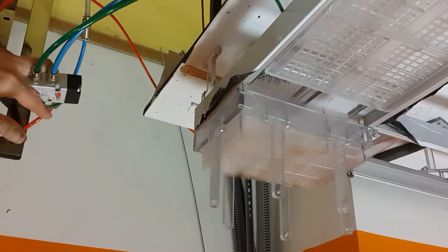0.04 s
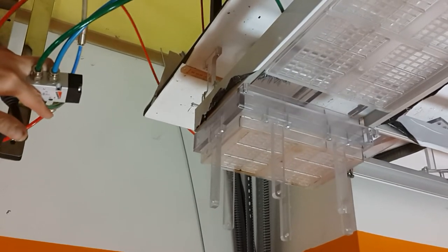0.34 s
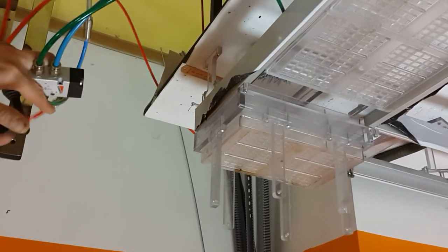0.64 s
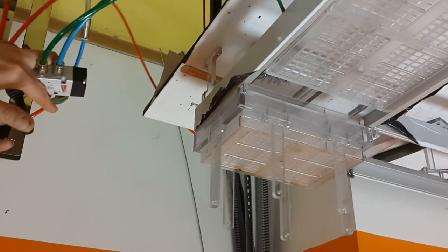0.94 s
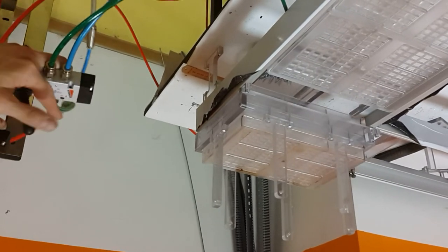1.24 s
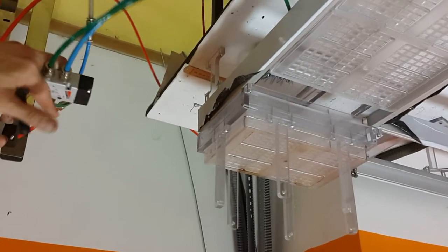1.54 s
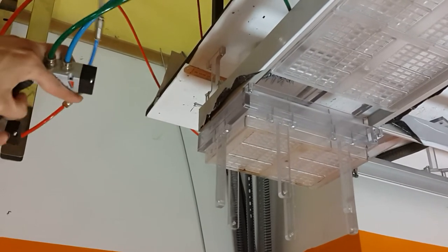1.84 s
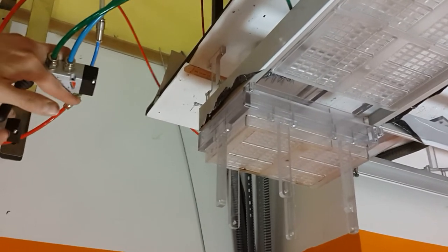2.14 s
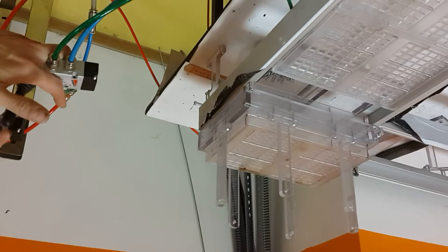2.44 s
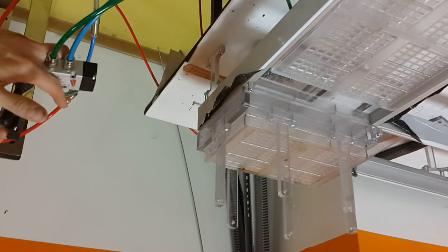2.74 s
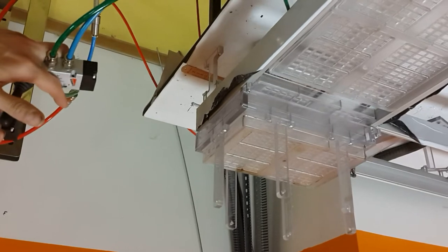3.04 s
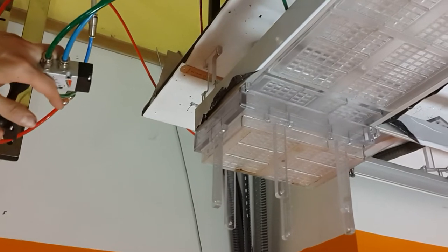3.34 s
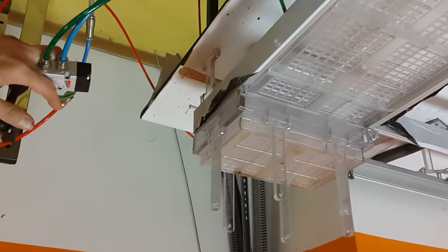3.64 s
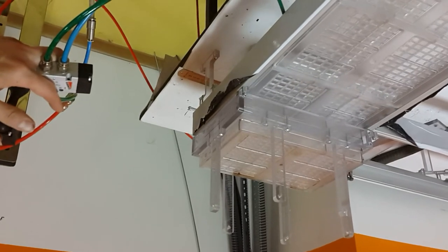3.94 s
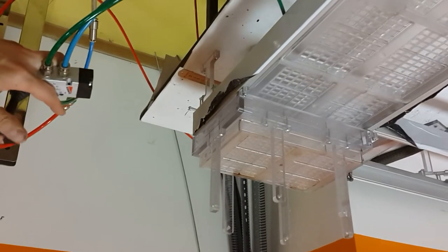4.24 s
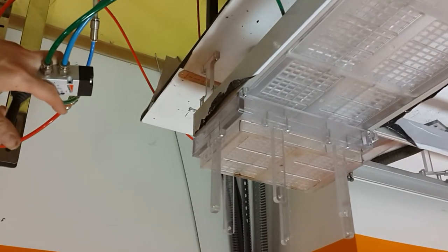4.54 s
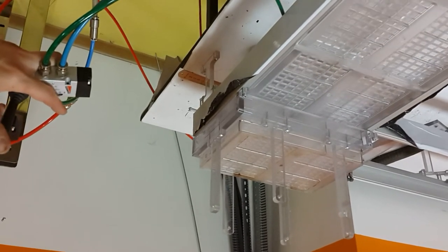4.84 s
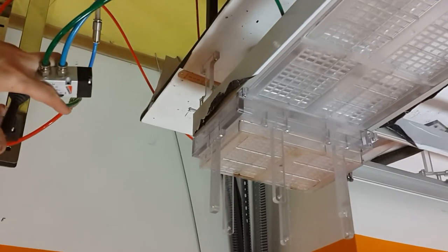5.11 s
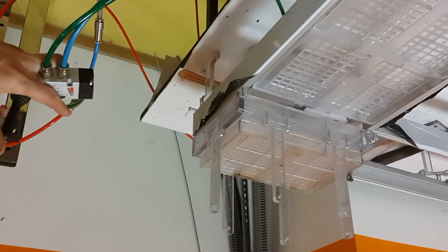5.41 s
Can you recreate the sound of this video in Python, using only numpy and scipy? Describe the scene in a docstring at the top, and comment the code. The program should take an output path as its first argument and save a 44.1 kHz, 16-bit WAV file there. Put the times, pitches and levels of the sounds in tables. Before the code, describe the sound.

A pneumatic machine gusts and thumps, then hisses steadily over motor hum as its sliding tray squeals once and steel clacks.

```python
"""Gusts of air burst out as a hand valve switches the air cylinders of a machine in a workshop.
The strokes end in clacks of steel on steel and thumps that shake the frame. Air hisses on through a
silencer, and a sliding tray squeals once, over background rumble and motor hum.
Hard walls echo. Two close microphones hear it, and a limiter turns down the loudest blows."""
import sys
import numpy as np
from scipy import signal
from scipy.fft import rfft, irfft, next_fast_len
from scipy.io import wavfile
from scipy.ndimage import uniform_filter1d, minimum_filter1d

SR = 44100
rng = np.random.default_rng(int(sys.argv[2]) if len(sys.argv) > 2 else 0)


def pcm_store(signal):
    """Save signal as 16-bit PCM."""
    levels = np.round(np.clip(np.atleast_2d(signal), -1, 1) * 32767)
    wavfile.write(sys.argv[1], SR, levels.astype(np.int16).T)


N = 250047
TIME = np.arange(N) / SR
SIDES = np.array([[.5], [-.5]])  # splits a left-right difference between the two channels
BLEED_S, SLIDE_S = 1.977, 2.627  # air starts to leak out; the tray starts to slide


def amp(db):
    """Turns decibels into a gain."""
    return 10 ** (np.asarray(db) / 20)


def unit(x):
    """Scales a signal to an average power of 1."""
    return x / np.sqrt(np.mean(x ** 2) + 1e-20)


def read(points, hz):
    """Reads between the rows of a table, on a log-frequency axis."""
    f, value = np.transpose(points)
    return np.interp(np.log(hz + 1), np.log(f + 1), value)


def ramp(start_s, rise_s):
    """A smooth step from 0 to 1."""
    return np.sin(np.pi / 2 * np.clip((TIME - start_s) / rise_s, 0, 1)) ** 2


def after(s):
    """Seconds since a moment, zero before it."""
    return np.maximum(TIME - s, 0)


def add(mix, s, sound):
    """Mixes in a two-channel sound at s seconds."""
    part = mix[:, max(round(s * SR), 0):][:, :sound.shape[1]]
    part += sound[:, :part.shape[1]]


def colour(x, db_of):
    """Shapes the tone by a curve of dB against Hz, with a filter that never rings ahead of the sound."""
    hz = abs(np.fft.fftfreq(4096, 1 / SR))
    log_gain = np.log(amp(np.maximum(db_of(hz), -100)))
    taps = np.fft.ifft(np.exp(np.conj(signal.hilbert(log_gain)))).real[:2048]
    return signal.oaconvolve(x, taps[None] / np.linalg.norm(taps), axes=1)[:, :x.shape[1]]


def turbulence(spectrum, patchy_db):
    """Rushing noise whose level drifts in small patches of time and pitch."""
    hz, frames = np.fft.rfftfreq(1024, 1 / SR), N // 256 + 5
    shape = (2, len(hz), frames)
    noise = rng.standard_normal(shape) + 1j * rng.standard_normal(shape)
    patches = uniform_filter1d(rng.standard_normal(shape[1:]), size=4, axis=0)
    patches = uniform_filter1d(patches, size=8, axis=1)
    noise *= amp(read(spectrum, hz)[:, None] + patchy_db * unit(patches))
    return unit(signal.istft(noise, nperseg=1024, noverlap=768)[1][:, :N])


def panel_echoes(x, echo_db):
    """Panels near the valve throw back eight quick echoes that colour the sound."""
    out = x.copy()
    for side in range(2):
        for delay in rng.uniform(0.00055, .014, size=8):
            out[side] += amp(echo_db) * np.interp(TIME - round(delay * SR) / SR, TIME, x[side], left=0)
    return out / np.sqrt(1 + 8 * amp(echo_db) ** 2)


def room(x, build_s):
    """Wall echoes blur into a tail that builds up, then dies at its own speed in each band."""
    # echo length (t60 is the time to fade by 60 dB): f/Hz, t60/s
    fade_times = [(100, 0.48), (400, 0.84), (1500, 0.83), (4000, 0.76), (7000, 0.66), (11000, 0.43),
                  (16000, 0.44)]
    hz, t, noise = signal.stft(rng.standard_normal((2, int(1.3 * SR))), SR, nperseg=256)
    tail = signal.istft(noise * amp(-60 * t / read(fade_times, hz)[:, None]), SR, nperseg=256)[1]
    tail *= 1 - np.exp(-(TIME[:tail.shape[1]] / build_s) ** 2)
    return signal.fftconvolve(x, tail / np.linalg.norm(tail[0]), axes=1)[:, :N]


def microphones(x):
    """Two close microphones hear the bass alike and the treble apart; the left one faces the valve."""
    # how alike the two sides are: f/Hz, correlation (1 = the same)
    likeness = [(100, 1), (300, 0.91), (600, 0.69), (1000, 0.28), (1500, -0.22), (2300, -0.02),
                (3500, -0.12), (6500, 0.086), (15000, -0.19)]
    # how much louder the left side is: f/Hz, left minus right/dB
    balance = [(60, -6.5), (110, 2), (200, -1), (380, 2), (700, -2), (1290, -3), (2380, 1.5), (4400, 5.0),
               (8120, 6), (15000, 0.5)]
    size = next_fast_len(N + 4096)
    hz = np.fft.rfftfreq(size, 1 / SR)
    same = np.clip(read(likeness, hz), -.99, .99)
    mid, side = rfft(x, size) * np.sqrt([(1 + same) / 2, (1 - same) / 2])
    return irfft(np.array([mid + side, mid - side]) * amp(SIDES * read(balance, hz)), size)[:, :N]


def background(hum_db=33, swell_s=0.38, rest_db=-63.5):
    """Rumble and motor hum grow louder as the hiss rises, like a recorder turning up its gain."""
    # tone of the rumble: f/Hz, level/dB
    spectrum = [(25, -41), (60, -25.5), (150, -0.5), (300, 2.5), (800, 2), (1300, 1.5), (2000, 0),
                (3200, -9), (6500, -14), (9000, -25), (15500, -26.5)]
    # motor tones: f/Hz, relative level/dB
    motors = [(48.4, -86.5), (70.0, -56), (96.9, -71.5), (145.3, -51), (209.9, -56)]
    opening_fade = amp(-41 - 10.5 * TIME)
    first_rise = ramp(BLEED_S - swell_s, swell_s) * amp(-52)
    second_rise = ramp(SLIDE_S, swell_s) * amp(-33 - 10.5 * np.exp(-after(SLIDE_S) / 0.77))
    level = np.sqrt(amp(rest_db) ** 2 + opening_fade ** 2 + first_rise ** 2 + second_rise ** 2)
    rumble = turbulence(spectrum, patchy_db=.8)
    hum = np.zeros(N)
    for hz, db in motors:
        drift = np.cumsum(rng.standard_normal(N)) / np.sqrt(SR)
        hum += amp(db + hum_db) * np.sqrt(2) * np.sin(2 * np.pi * hz * TIME + hz / 40 * drift)
    return level * rumble, level * hum


def silencer(bleed_db=-37.5, slide_db=-28):
    """Air hisses through a porous plug: a fading leak at first, a free flow once the tray slides."""
    # tone of the plug, with a broad high peak: f/Hz, level/dB
    spectrum = [(300, -19.5), (1000, -43), (1700, -10), (2050, -8), (2500, -8.5), (3200, -13), (4500, -11),
                (5500, -4), (6500, 3), (7500, -5.5), (9000, -11.5), (10300, -30), (15000, -40.5),
                (17000, -77)]
    bleed = ramp(BLEED_S, rise_s=0.043) * amp(bleed_db - 4 * after(BLEED_S))
    slide = ramp(SLIDE_S, rise_s=0.6) * amp(slide_db - 0.28 * after(SLIDE_S))
    hiss = turbulence(spectrum, patchy_db=.5)
    return panel_echoes(np.hypot(bleed, slide) * hiss, echo_db=-13)


def squeal(pitch_hz=1698, sharp_hz=20, settle_s=0.064, waver_hz=3.63, shimmer_db=2, t60=0.33):
    """One squeal swells, then its echo fades in uneven pulses that shift between left and right."""
    # the tray's squeal, then the pulses of its echo: t/s, swell/s, level/dB, left minus right/dB
    pulses = [(3.26, 0.16, -11, -2), (3.435, 0.023, -14, 1), (3.53, 0.082, -24, -9.5),
              (3.69, 0.03, -30, -13.5), (3.765, 0.038, -31.5, -9)]
    # thin overtones: multiple of the pitch, relative level/dB
    overtones = [(2, -21), (3, -22), (4, -28), (5, -33)]
    level = np.sqrt(sum((ramp(s, rise) * amp(db + SIDES * pan_db - 60 * after(s + rise) / t60)) ** 2
                        for s, rise, db, pan_db in pulses))
    hz = pitch_hz + sharp_hz * np.exp(-(after(pulses[0][0]) / settle_s) ** 4)  # starts sharp, settles
    waver, shimmer = (unit(uniform_filter1d(rng.standard_normal(N), size=600)) for _ in range(2))
    phase = 2 * np.pi * np.cumsum(hz + waver_hz * waver) / SR
    lead = SIDES * 1.85  # the left side leads, in radians
    tone = np.sin(phase + lead)
    strength = (level / level.max()) ** 0.41  # overtones stand out more when the tone is loud
    for multiple, db in overtones:
        tone += strength * amp(db + SIDES * 8) * np.sin(round(multiple) * phase + lead)
    return np.sqrt(2) * level * amp(shimmer_db * shimmer) * tone


def strike(modes, t60, ring_t60, ring_db, grain):
    """A blow is a fading rattle of tiny contacts that also rings the part's own notes (its modes)."""
    t = TIME[:int(.8 * SR)]
    flutter = unit(uniform_filter1d(rng.standard_normal(len(t)), size=50))
    chatter = unit(np.exp(grain * np.tanh(flutter)))
    contacts = chatter * amp(-60 * t / t60) * rng.standard_normal((2, len(t)))
    ring = sum(amp(db) * np.sin(2 * np.pi * (hz * t + rng.random((2, 1)))) for hz, db in modes)
    ring *= amp(-60 * t / ring_t60)
    ringing = signal.fftconvolve(contacts, ring / np.linalg.norm(ring[0]), axes=1)[:, :len(t)]
    return contacts + amp(ring_db) * ringing


def thumps(rise_s=0.0049, boom_hz=340, boom_db=3.5, bright_hz=3654, db_per_octave=10):
    """The frame and its sheet panels shake as they take the load; softer blows sound duller."""
    # blows to the frame: t/s, level/dB, rattle t60/s
    blows = [(0.058, -38, 0.045), (.128, -31, 0.22), (0.202, -3.5, 0.081), (.228, 3, 0.12), (.287, -5, 0.1),
             (.331, -5.5, 0.04), (0.849, -22, 0.087), (1.892, -38.5, 0.13), (2.96, -19.5, 0.14),
             (3.670, -20.5, 0.22), (3.924, -22.5, 0.22), (4.505, -28.5, 0.32), (4.564, -11.5, 0.1)]
    # ringing notes of the frame: f/Hz, level/dB
    modes = [(506.0, -43.5), (613.7, -57.5), (834.4, -30), (1055, -42), (1184, -40), (1437, -55.5),
             (1523, -33), (1631, -40.5), (1696, -55), (1733, -37.5), (1782, -45), (1890, -35),
             (2153, -34.5), (2245, -47), (2304, -62.5), (2406, -46), (2783, -54.5), (2821, -76)]
    # overall tone of the frame: f/Hz, level/dB
    spectrum = [(40, -35), (90, -12.5), (170, -5.5), (320, -4), (900, 2.5), (2000, 4), (4000, 2), (7000, 6),
                (10000, 0), (15000, -7), (17000, -11.5)]
    out = np.zeros((2, N))
    body_db = lambda f: read(spectrum, f) + boom_db / (1 + (3 * (f / boom_hz - 1)) ** 2)
    for s, db, t60 in blows:
        blow = strike(modes, t60, ring_t60=.22, ring_db=-25, grain=.2)
        blow *= 1 - np.exp(-TIME[:blow.shape[1]] / rise_s)
        cutoff_hz = bright_hz * 2 ** (db / db_per_octave)
        add(out, s, amp(db) * colour(blow, lambda f: body_db(f) - 7 * np.log(1 + (f / cutoff_hz) ** 2)))
    return out


def clacks():
    """Steel stops meet; the hardness of each contact sets which band of pitches stands out."""
    # blows on the stops: t/s, level/dB, band centre/Hz, rattle t60/s
    blows = [(0.2003, -4.5, 2860, 0.08), (1.892, -27, 2180, 0.02), (2.927, -26.5, 1080, 1),
             (2.957, -18, 1630, 0.21), (4.503, -2.5, 2580, 0.024), (4.563, -13, 390, 0.031)]
    # ringing notes of the stops: f/Hz, level/dB
    modes = [(1437, -32), (1787, -24), (2277, -42), (2972, -49), (3467, -25), (4188, -38), (5480, -58),
             (6309, -30), (7456, -41), (7887, -35)]
    # overall tone of the steel: f/Hz, level/dB
    spectrum = [(40, 9.5), (300, -0.5), (3000, -2), (7000, -6.5), (10000, -11), (15000, -14), (17000, -49)]
    out = np.zeros((2, N))
    for s, db, hz, t60 in blows:
        blow = strike(modes, t60, ring_t60=.06, ring_db=-15, grain=.3)
        band_db = lambda f: read(spectrum, f) - 5.5 * np.log(1 + (f / hz - hz / (f + 1)) ** 2 / 2)
        add(out, s, amp(db) * colour(blow, band_db))
    return out


def gusts(leak_db=-9, spit_s=0.027, stop_s=0.048):
    """The valve cracks open, then snaps wide; the jet of air fades, and ends when the piston stops."""
    # valve switches: t/s, level/dB, wait until wide open/s, emptying t60/s, first spit/dB, stroke/s
    switches = [(.051, -15.5, 0.0054, 0.92, 10, 0.1), (0.793, -18, 0.0072, 0.48, 0.5, 0.3),
                (1.881, -16.5, 0.01, 0.47, 0.5, 0.24)]
    # tone of the jet: f/Hz, level/dB
    spectrum = [(50, -43.5), (120, -15), (220, -17.5), (500, -40.5), (1000, -25), (1800, -17), (3000, -14),
                (4300, -7), (5300, -7.5), (6500, -2.5), (7700, -9), (11000, -15), (15000, -15.5),
                (17000, -56)]
    flow = np.zeros(N)
    for s, db, lag, t60, spit_db, stroke_s in switches:
        since_wide = after(s + lag)
        crack = amp(leak_db) * (1 - np.exp(-after(s) / .002))
        snap = (1 - amp(leak_db)) * (1 - np.exp(-since_wide / .001))
        spit = 1 + (amp(spit_db) - 1) * np.exp(-since_wide / spit_s) * (since_wide > 0)
        moving = np.exp(-after(s + stroke_s) / stop_s)
        flow += (crack + snap) * spit * moving * amp(db - 60 * since_wide / t60)
    return panel_echoes(flow * turbulence(spectrum, patchy_db=4.5), echo_db=-32)


def scene():
    """Mixes all sources; the gusts, the blows and a little of the squeal echo in the room."""
    air, steel, frame, tray = gusts(), clacks(), thumps(), squeal()
    rumble, hum = background()
    to_room = amp(-5) * air + amp(-3) * steel + amp(-1) * frame + amp(-20) * tray
    return microphones(air + steel + frame + silencer() + rumble + room(to_room, 0.007)) + tray + hum


def record(dry, limit_db=-9, release_db_per_s=26, top_hz=15700):
    """A limiter dips just before loud blows and recovers slowly; peaks are clipped, top treble is cut."""
    power_db = 10 * np.log10(abs(uniform_filter1d((dry ** 2).mean(0), size=300)) + 1e-12)
    over_db = np.maximum(power_db - limit_db, 0)
    held_db = np.maximum.accumulate(over_db + release_db_per_s * TIME) - release_db_per_s * TIME
    dip_db = -minimum_filter1d(-held_db, size=5000)  # sees a blow coming some 55 ms ahead
    limited = np.clip(dry * amp(-uniform_filter1d(dip_db, size=1200)), -.9, .9)
    lowpass = signal.firwin(255, top_hz, window=("kaiser", 8), fs=SR)
    return signal.oaconvolve(limited, lowpass[None], "same")


dry = scene()
out = record(dry)
pcm_store(out)
```